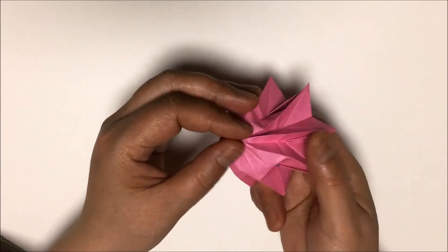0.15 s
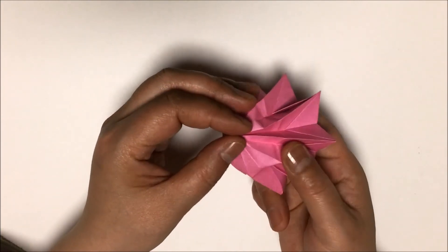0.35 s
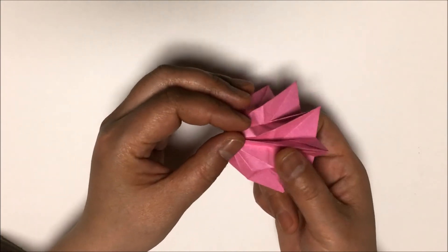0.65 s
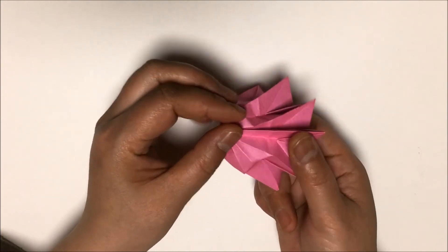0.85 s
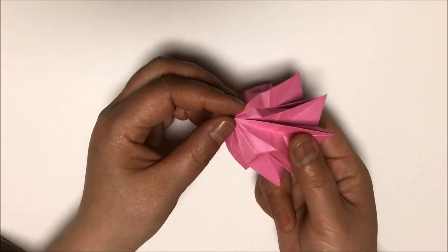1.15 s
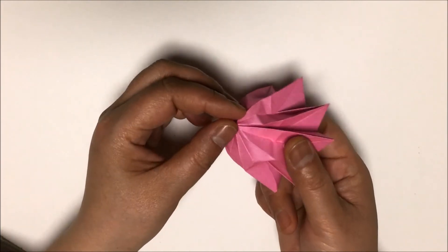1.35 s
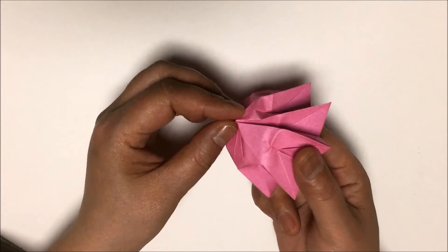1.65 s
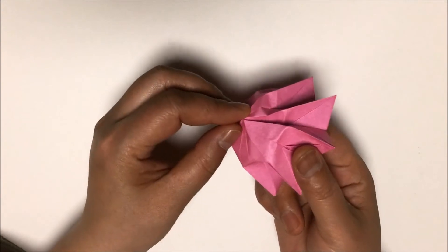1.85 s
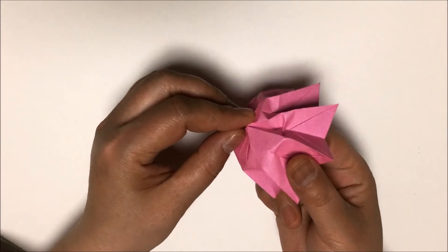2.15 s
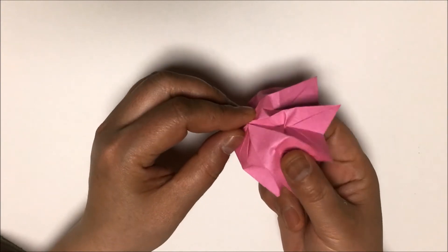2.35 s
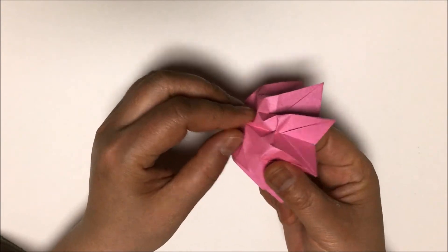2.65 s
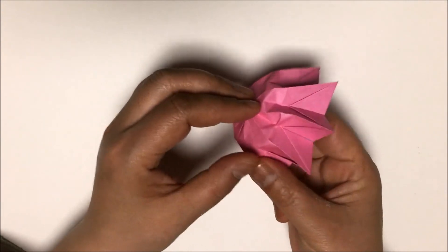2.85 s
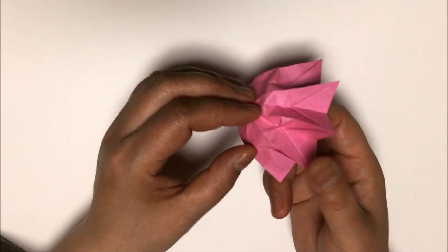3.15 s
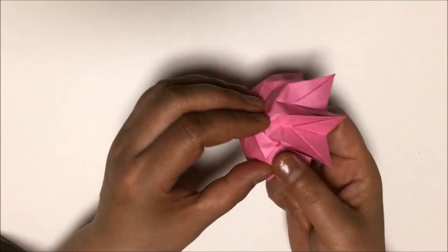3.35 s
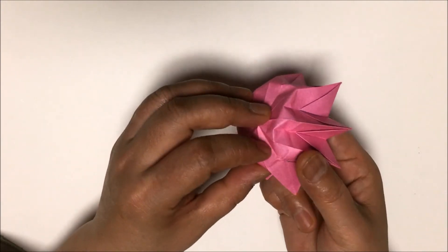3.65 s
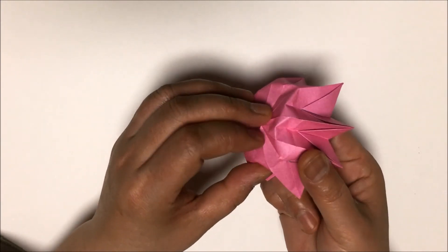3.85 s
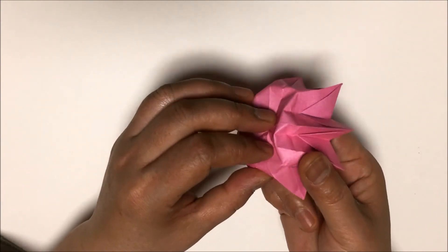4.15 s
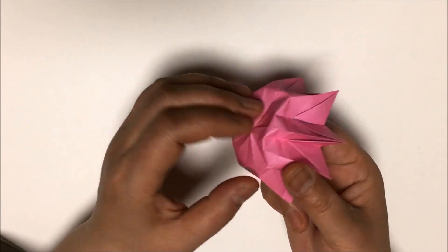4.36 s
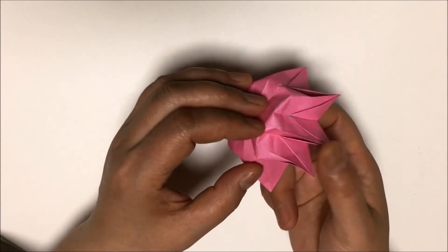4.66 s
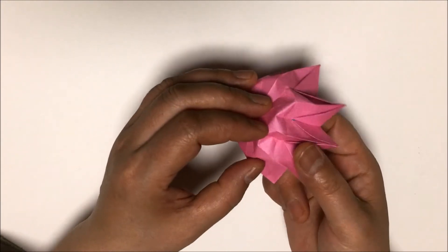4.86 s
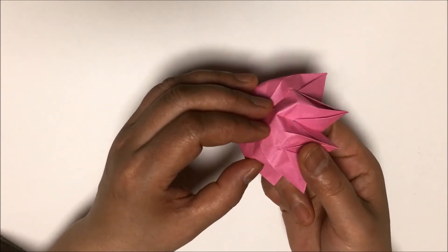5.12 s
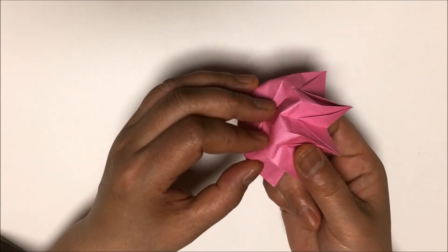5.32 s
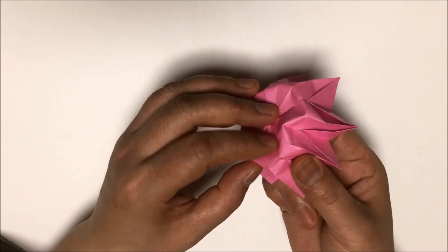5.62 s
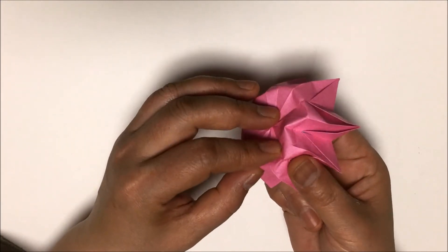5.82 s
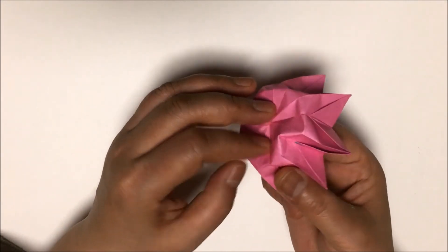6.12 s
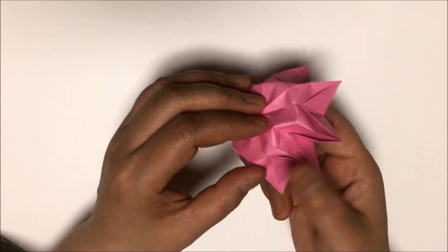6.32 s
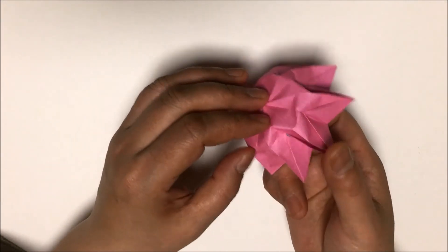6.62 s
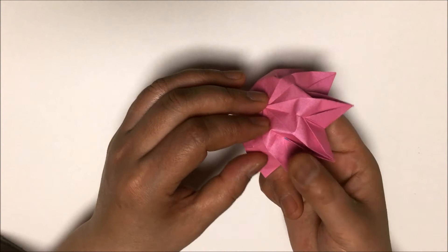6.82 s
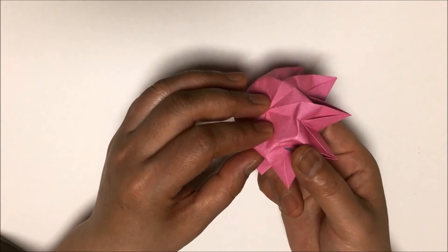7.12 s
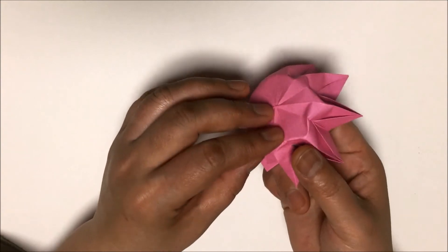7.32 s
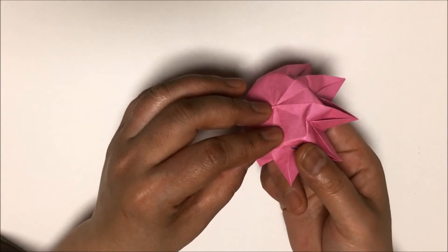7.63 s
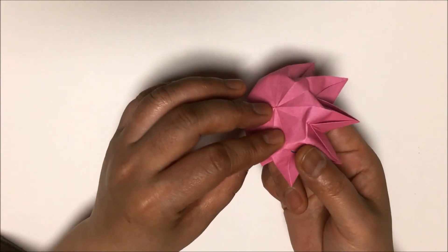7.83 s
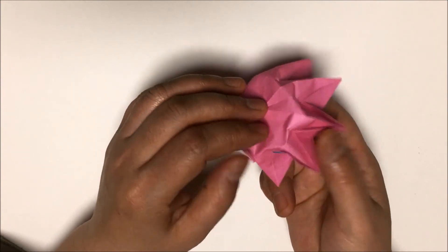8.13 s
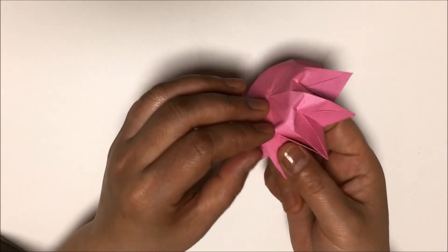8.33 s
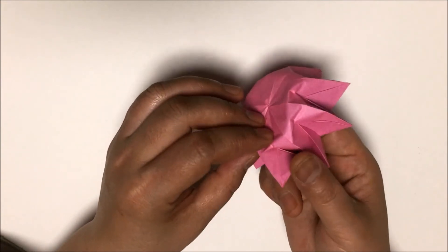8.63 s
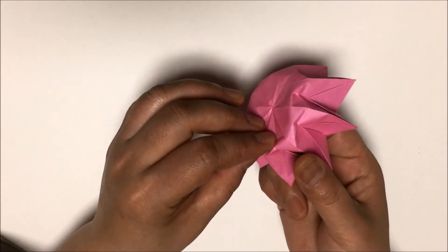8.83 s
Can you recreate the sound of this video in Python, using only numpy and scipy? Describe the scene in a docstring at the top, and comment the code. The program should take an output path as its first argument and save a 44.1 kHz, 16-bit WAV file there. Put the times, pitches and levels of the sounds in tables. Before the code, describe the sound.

Fingers work a folded paper shape, making dry crackles, sharp little snaps and brief rustles in a quiet room.

```python
"""Fingers work a many-pointed paper fold just above a table, in a quiet room with a low ventilation hum.
From the start, layers of paper slide over each other in brief strokes that start and stick abruptly.
Creases buckle with short dry snaps, loudest near 0.3 s and 2.2 s; a fingertip squeaks faintly at 3.2 s.
Another loud snap comes at 6.4 s, and smaller snaps and slides go on until about 9 s.
All along, the hands bump softly now and then, and the room answers each snap."""
import sys
import numpy as np
from scipy import signal
from scipy.fft import rfft, irfft, next_fast_len
from scipy.io import wavfile
from scipy.ndimage import uniform_filter1d, map_coordinates

SR = 44100
rng = np.random.default_rng(int(sys.argv[2]) if len(sys.argv) > 2 else 0)


def put_to_file(sound):
    """Save the sound as 16-bit audio at rate SR, in the file named by the first command-line argument."""
    columns = np.atleast_2d(sound).T  # one column per channel
    safe = np.clip(columns, -1, 1)
    whole_steps = np.round(safe * 32767)
    wavfile.write(sys.argv[1], SR, whole_steps.astype(np.int16))


N = 396018

# One layer slides over another: start_s, length_s, level_db, swell_db, brightness_db_per_octave
SLIDES = [(0.046, 0.048, -53.5, 2, 2.5), (0.114, 0.051, -60.5, -7, -1), (0.295, 0.074, -62, 3.5, 4.5),
          (0.472, 0.053, -55, 6, 3), (0.544, 0.092, -57, -8.5, 0.5), (0.896, 0.15, -67, 10, -2),
          (1.071, 0.028, -51.5, 8, -0.5), (1.203, 0.051, -57.5, 5.5, 0.5), (1.325, 0.037, -46, -10, 0),
          (1.403, 0.015, -49, 8, -2.1), (1.441, 0.057, -65, -12, 0.5), (1.524, 0.025, -47.5, 4.5, -1),
          (1.555, 0.057, -64, -6, -2.5), (1.7, 0.044, -62, 16, -2.5), (1.917, 0.025, -51.5, 7, -1.5),
          (2.386, 0.032, -56, 1, -4), (2.425, 0.022, -48.5, 9, -0.7), (2.512, 0.023, -53.5, 11, 0.3),
          (2.558, 0.032, -61, 1, -2.5), (2.768, 0.031, -56.5, 7, 1.5), (2.813, 0.04, -75.5, -2, -6.5),
          (2.87, 0.02, -48.5, 3, -1), (2.893, 0.045, -56.5, -8, 1), (2.953, 0.076, -48, 5, 0.8),
          (3.034, 0.04, -63, -3, -2.5), (3.158, 0.09, -62.5, 8, 0), (3.358, 0.028, -53.5, -7, 2),
          (3.445, 0.042, -53, -4, 0.5), (3.537, 0.14, -67.5, 6, -2.5), (3.756, 0.08, -62, 4, 1),
          (4.252, 0.017, -67, 11, -2), (4.411, 0.035, -51, 14, -0.4), (4.563, 0.039, -54, -2, -0.5),
          (4.621, 0.09, -56, 11.5, -1.5), (4.787, 0.077, -64.5, 5, 1.5), (5.053, 0.065, -62.5, 10, 0),
          (5.284, 0.28, -66.5, -24, -2), (5.58, 0.022, -54.5, 0, -0.3), (5.696, 0.031, -53.5, -11.5, 0.7),
          (5.754, 0.013, -54, 27, -1), (6.046, 0.065, -56, -3, -1.5), (6.275, 0.02, -50.5, 21, 0.3),
          (6.376, 0.053, -55.5, 4.5, -0.8), (6.48, 0.067, -55, 0, -1.3), (6.577, 0.051, -56, 5, -0.2),
          (6.654, 0.14, -65, -6, -1.5), (6.955, 0.049, -62.5, 10, -2), (7.065, 0.089, -63, -4, -2.7),
          (7.322, 0.13, -65.5, -1, -1), (7.521, 0.042, -66, 11, -1.3), (7.669, 0.11, -68, -6, -1.2),
          (7.984, 0.093, -65.5, 8.5, -1.2), (8.108, 0.094, -58.5, -8, -0.5), (8.28, 0.05, -63, 1, 1),
          (8.343, 0.13, -60, 7, -1), (8.598, 0.12, -63, -1.5, 0), (8.871, 0.051, -59.5, 5, -1.5)]


def creases():
    """Creases give way one by one as the fingers work the fold."""
    # Body is the sound below the pitch, crack the sound above it.
    # start_s, level_db (as if the snap lasted 5 ms), pitch_hz, body_db, crack_db
    snaps = [(0.208, -57.5, 1100, 6, -7), (0.3386, -24.5, 2440, 6.5, -13), (0.4484, -52.5, 880, 0, -1),
             (0.482, -50.5, 553, -3, -10), (1.0222, -56, 674, 9, -25), (1.0745, -51, 3470, -9, 0),
             (1.0879, -38, 940, -8, 5.5), (1.0949, -42, 1200, 7, 16), (1.1117, -43.5, 780, 11, -9),
             (1.2451, -47.5, 3060, 2, 1), (1.319, -52, 2400, 5, 3), (1.339, -39, 6460, -3.5, -5),
             (1.3445, -41.5, 1520, 7, 2), (1.3623, -47, 2730, 5, -17), (1.417, -44.5, 1300, 9, 0),
             (1.4908, -51.5, 5430, -10, -6), (1.7378, -37, 2680, -1, -8), (1.7569, -33.5, 2260, -11.5, -15),
             (1.8202, -46, 2280, 13, -10), (2.2003, -24.5, 2360, -7.5, 8.5), (2.2236, -46, 2230, 9, 11),
             (2.3745, -52.5, 2350, -2, -6), (2.5329, -45, 2490, -17, 5), (2.6465, -56.5, 2170, 0, -9),
             (3.0691, -32, 2380, -5, -9.5), (3.348, -57, 2400, -1, 2), (3.4536, -35.0, 2070, -2, 6.5),
             (3.479, -49, 2550, -15, -5), (3.612, -50.0, 2230, -7, -5), (3.6622, -50.0, 2580, -7, 14),
             (3.7806, -46, 2240, -26, -18), (3.7913, -44, 2650, -1, 4), (4.0533, -43.5, 1990, -13, 1.5),
             (4.0684, -51.0, 2970, -9, -10), (4.1267, -55.5, 2180, -20, -7), (4.173, -58.5, 4990, 2.5, 7),
             (4.5935, -50, 1180, -5, -9), (4.6744, -47, 1143, -4, -3), (4.7934, -45, 2230, -2.5, 1),
             (4.86, -50.5, 6040, -10, -5), (4.9103, -37, 1930, -4, 3), (5.1006, -42, 6440, -5, -26),
             (5.1215, -40.5, 6500, 2, -16), (5.2517, -48, 2430, -9, -4), (5.268, -49.5, 3030, 6, -21),
             (5.6201, -36, 1410, 29.5, -13), (5.685, -50, 2400, -16, -11), (6.063, -45, 2380, -5, 0),
             (6.0952, -46.5, 3300, 5, 19), (6.1067, -41.5, 2230, -16, 5), (6.3073, -37, 1970, 4.5, 3.5),
             (6.4064, -24, 2190, 0.5, 8), (6.4904, -51, 1820, 5, 6), (6.4977, -44, 2200, -7, 0),
             (6.5964, -50, 1080, -12, -4), (6.9773, -47.5, 884, 7, -3), (7.0026, -48, 3660, -4, 3),
             (7.0649, -50.5, 3930, -6, 5), (7.128, -47, 2750, 5, 12), (7.298, -51.0, 835, -11, -2),
             (7.3887, -50, 916, -12, 0), (7.4368, -53.5, 2340, -9, -6), (7.664, -54, 3320, -5, 9),
             (7.8023, -32.5, 6400, -4.5, -6), (8.0483, -52, 2200, 1, 5), (8.1176, -37.5, 904, 10, -1),
             (8.1651, -33.0, 2100, -12, 3.5), (8.28, -51.5, 6000, 1, 32), (8.621, -54, 1080, 7, 0),
             (8.6372, -30, 4170, -18, -10.5), (8.9044, -48, 1760, -6, -10), (8.9349, -41.5, 4070, -18, -14)]
    return buckles(snaps)


def buckles(snaps, strain=0.009, strain_s=0.022, flutter=0.26, flutter_s=0.0037, table_echo_s=0.001002):
    """Each crease strains, pops through with one sharp push, flutters and echoes off the table."""
    out = np.zeros(N)
    lead, size = SR // 60, 4096  # samples before the pop, and in all
    t = (np.arange(size) - lead) / SR
    hz = np.fft.rfftfreq(size, 1 / SR)
    build_up = strain * np.exp(-np.abs(t) / strain_s)
    die_down = flutter * np.exp(-(t / flutter_s) ** 2)
    for start_s, level_db, pitch_hz, body_db, crack_db in snaps:
        push = np.where(t < 0, build_up, die_down) * rng.standard_normal(size)
        push[lead] += 2  # the pop
        push[lead + round(table_echo_s * rng.uniform(0.7, 1.4) * SR)] += 1.5  # its echo
        pop = irfft(rfft(push) * facet(hz, pitch_hz, body_db, crack_db))
        pop *= np.sqrt(0.005 * SR / np.sum(pop ** 2))
        add(out, start_s - lead / SR, amp(level_db) * pop)
    return out


def facet(hz, pitch_hz, body_db, crack_db, ring_db=8.5, ring_octaves=0.39, flap_hz=210):
    """How a facet (a flat patch of paper) rings: big flaps knock low, small facets crack high."""
    # Tone that all facets share: frequency_hz, level_db
    shared_tone = [(60, -32), (200, -33), (330, -22.5), (520, -3), (720, 3.5), (1050, 8), (1450, 6),
                   (1750, 1), (2200, 2), (2800, 0.5), (3300, -3), (4200, -3.5), (5200, -7), (6800, -8),
                   (10000, -14.5), (16000, -23)]
    octaves = np.log2((hz + 1) / pitch_hz)
    peak_db = ring_db * np.exp(-(octaves / ring_octaves) ** 2)
    sides_db = np.where(octaves < 0, body_db, crack_db) * np.tanh(np.abs(octaves))
    bass_loss_db = 10 * np.log10(1 + (flap_hz / (hz + 1)) ** 4)  # slow flapping moves little air
    return quickest_decay(amp(along(shared_tone, hz) + peak_db + sides_db - bass_loss_db))


def sliding(grip_s=0.0072, stick_s=0.0089, pivot_hz=2330):
    """Each slide breaks loose, swells or fades, and sticks again; its contact sets its brightness."""
    # Borders of four bands (panel, rasp, scrape, hiss): frequency_hz
    edges_hz = [380, 1700, 3200, 7500, 16000]
    # An ordinary slide in each of those bands: level_db
    contact_db = [1.05, 5, 0.53, -17]
    out = np.zeros(N)
    bands = split_bands(friction(), edges_hz)
    centres_hz = np.sqrt(np.multiply(edges_hz[:-1], edges_hz[1:]))
    octaves = np.log2(centres_hz / pivot_hz)
    for start_s, length_s, level_db, swell_db, brightness in SLIDES:
        first = max(round((start_s - 5 * grip_s) * SR), 0)
        last = min(round((start_s + length_s + 5 * stick_s) * SR), N)
        span = np.arange(first, last)
        t = span / SR - start_s
        speed = amp(swell_db * np.clip(t / length_s, 0, 1))
        speed *= np.exp(np.minimum(t, 0) / grip_s - np.maximum(t - length_s, 0) / stick_s)
        speed /= np.sqrt(np.sum(speed ** 2) / (length_s * SR))
        gains = amp(level_db + np.add(contact_db, brightness * octaves))
        out[span] += speed * sum(gain * unit(band[span]) for gain, band in zip(gains, bands))
    return out


def friction(catches_per_s=1500, smooth_share=0.71, judder_db=2.0, judders_per_s=150):
    """Fibres catch and let go in tiny clicks over a smooth hiss, juddering as they go."""
    # Tone of the sliding sheet: frequency_hz, level_db
    paper_tone = [(300, -15), (600, -14), (950, 0), (1400, -4), (1750, -3.5), (2200, 11), (2800, 6),
                  (3300, -5.5), (4300, -9), (5000, -10), (6300, -10), (9000, -7), (12000, 6), (16000, -0.5)]
    catches = (rng.random(N) < catches_per_s / SR) * rng.choice([-1, 1], N)
    strength = np.exp(0.55 * rng.standard_normal(N))
    clicks = np.sqrt(1 - smooth_share) * unit(catches * strength)
    hiss = np.sqrt(smooth_share) * rng.standard_normal(N)
    judder = amp(judder_db * wobble(judders_per_s))
    return coloured(flexing((clicks + hiss) * judder), paper_tone)


def flexing(sound, ring_db=4.5, scratch_db=4.5):
    """The panels' ringing shifts as the fold changes shape; edges scratch in brief, bright streaks."""
    hz, _, spectrum = signal.stft(sound, SR, nperseg=512)

    def patches(width, frames):
        noise = rng.standard_normal(spectrum.shape)
        return unit(uniform_filter1d(uniform_filter1d(noise, width, 0), frames, 1))

    rings = patches(width=2, frames=14)
    streaks = patches(width=7, frames=5) * np.clip(hz / 6000, 0, 1)[:, None]
    return signal.istft(spectrum * amp(ring_db * rings + scratch_db * streaks), nperseg=512)[1][:N]


def crinkles(pops_per_s=26, middle_hz=1910, scatter_octaves=0.7, scatter_db=2.5, body_db=-3, crack_db=-2):
    """Sliding paper pops small facets at random moments, louder under a firmer slide."""
    pops = []
    for start_s, length_s, slide_db, _, _ in SLIDES:
        waits_s = np.cumsum(rng.exponential(1 / pops_per_s, size=12))
        for wait_s, (force, height) in zip(waits_s, rng.standard_normal((12, 2))):
            if wait_s < length_s:
                level_db = slide_db - 3 + scatter_db * force
                pitch_hz = middle_hz * 2 ** (scatter_octaves * height)
                pops.append((start_s + wait_s, level_db, pitch_hz, body_db, crack_db))
    return buckles(pops)


def squeaks(waver=0.16, overtone_db=-16):
    """A fingertip sticks and slips on the sheet; for a few cycles the slips lock to one pitch."""
    # Fingertip slips: start_s, length_s, pitch_hz, level_db
    slips = [(3.23, 0.0075, 987, -46.5), (3.235, 0.028, 887, -49)]
    out = np.zeros(N)
    for start_s, length_s, pitch_hz, level_db in slips:
        n = int(length_s * SR)
        phase = 2 * np.pi * np.cumsum(pitch_hz * (1 + waver * wobble(290)[:n])) / SR
        tone = np.sin(phase) + amp(overtone_db) * np.sin(2 * phase)
        add(out, start_s, amp(level_db) * unit(signal.windows.tukey(n, 0.5) * tone))
    return out


def hand_bumps():
    """Skin and knuckles nudge the fold and the table with dull, short swells."""
    # Soft bumps: start_s, length_s, level_db
    nudges = [(0.397, 0.18, -82), (2.87, 0.076, -72.5), (4.6, 0.19, -78.5), (4.832, 0.041, -67),
              (5.223, 0.12, -70), (5.512, 0.2, -71), (6.288, 0.036, -61.5), (6.955, 0.039, -74),
              (7.797, 0.013, -56), (8.122, 0.0079, -55.5)]
    # Dull tone of a hand: frequency_hz, level_db
    hand_tone = [(60, -57.5), (140, -17.5), (200, -5), (300, -19), (400, -4), (560, -8), (900, -65.5)]
    out = np.zeros(N)
    thud = coloured(rng.standard_normal(N), hand_tone)
    for start_s, length_s, level_db in nudges:
        part = thud[round(start_s * SR):][:int(length_s * SR)]
        add(out, start_s, amp(level_db) * unit(part * np.sqrt(np.hanning(len(part)))))
    return out


def settling(ticks_per_s=9, tick_db=-57, middle_hz=2300, fade_s=0.014, grit=0.15):
    """The held fold never quite rests: faint ticks, each from a facet of its own pitch."""
    out = np.zeros(N)
    t = np.arange(SR // 60) / SR
    for start_s in rng.uniform(0, N / SR, int(ticks_per_s * N / SR)):
        pitch_hz = middle_hz * 2 ** rng.uniform(-1.2, 1)
        tick = np.sin(2 * np.pi * pitch_hz * t) + grit * rng.standard_normal(len(t))
        level_db = tick_db + rng.uniform(-5.6, 1)
        add(out, start_s, amp(level_db - 60 * t / fade_s) * tick)
    return out


def room_echo(sound, first_wall_s=0.0083, near_db=-10):
    """Near objects scatter a little at once; the walls answer after a short gap and die away."""
    # Time the echo takes to fall by 60 dB: frequency_hz, fade_s
    fade_times = [(200, 0.14), (1000, 0.19), (3000, 0.17), (8000, .18), (15000, 0.14)]
    # Tone of the echo: frequency_hz, level_db
    echo_tone = [(200, 11.5), (600, -11.5), (1000, -7), (1700, -6), (2600, -5), (4000, -7), (8000, -10),
                 (15000, -2.5)]
    hz, t, noise = signal.stft(rng.standard_normal(SR // 2), SR, nperseg=256)
    fade_db = along(echo_tone, hz)[:, None] - 60 * t / along(fade_times, hz)[:, None]
    tail = signal.istft(noise * amp(fade_db), SR, nperseg=256)[1]
    tail *= np.where(np.arange(len(tail)) / SR < first_wall_s, amp(near_db), 1)
    return signal.fftconvolve(sound, tail / np.linalg.norm(tail))[:N]


def ventilation(air_db=-68, hum_hz=227, hum_db=-80):
    """The ventilation makes a soft rush of air and a wavering hum."""
    # Tone of the moving air: frequency_hz, level_db
    air_tone = [(15, -37), (25, -18), (66, 4.5), (161, 0), (217, 3), (309, 0.5), (560, -4.5), (936, -3.5),
                (1790, -8.5), (2840, -9.5), (4870, -16), (6210, -14.5), (10400, -22.5), (14800, -21),
                (16000, -36.5)]
    hum = np.sin(2 * np.pi * hum_hz * np.arange(N) / SR + 1.02 * wobble(25))
    rush = coloured(rng.standard_normal(N), air_tone)
    return amp(air_db) * rush + amp(hum_db) * unit(hum)


def amp(db):
    """Turns decibels into a gain to multiply by."""
    return 10 ** (np.asarray(db) / 20)


def unit(x):
    """Scales x to an average strength (rms) of 1."""
    return x / np.sqrt(np.mean(x ** 2) + 1e-20)


def along(points, hz):
    """Reads between (frequency_hz, value) points, with octaves evenly spaced."""
    frequencies, values = np.transpose(points)
    return np.interp(np.log(hz + 1), np.log(frequencies + 1), values)


def wobble(rate):
    """A smooth curve through `rate` random values a second."""
    values = rng.standard_normal(int(N * rate / SR) + 4)
    return map_coordinates(values, [np.arange(N) * rate / SR])


def filtered(x, response):
    """Scales each frequency in x by response(hz)."""
    size = next_fast_len(N + SR // 2)
    return irfft(rfft(x, size) * response(np.fft.rfftfreq(size, 1 / SR)), size)[:N]


def coloured(x, tone):
    """Shapes x by (frequency_hz, level_db) points, at strength 1."""
    return unit(filtered(x, lambda hz: amp(along(tone, hz))))


def split_bands(x, edges_hz):
    """Splits x into bands between neighbouring edges, each at strength 1."""
    pairs = zip(edges_hz, edges_hz[1:])
    filters = [signal.butter(3, pair, 'bandpass', fs=SR, output='sos') for pair in pairs]
    return [unit(signal.sosfilt(sos, x)) for sos in filters]


def quickest_decay(gain):
    """The quickest-dying filter that has these gains."""
    cepstrum = irfft(np.log(gain + 1e-9))
    half = len(cepstrum) // 2
    return np.exp(rfft(np.r_[cepstrum[0], 2 * cepstrum[1:half]], len(cepstrum)))


def add(track, start_s, sound):
    """Mixes a sound into the track at start_s."""
    part = track[max(round(start_s * SR), 0):][:len(sound)]
    part += sound[:len(part)]


def scene(echo_db=-11.5):
    """Paper and hands close by, the room behind."""
    close = creases() + sliding() + squeaks() + hand_bumps() + settling() + crinkles()
    return (close + amp(echo_db) * room_echo(close) + ventilation())[None]


def record(dry):
    """Cuts off the very highest treble."""
    top_hz = 15950
    return filtered(dry[0], lambda hz: 1 / np.sqrt(1 + (hz / top_hz) ** 160))[None]


dry = scene()
out = record(dry)
put_to_file(out)
```